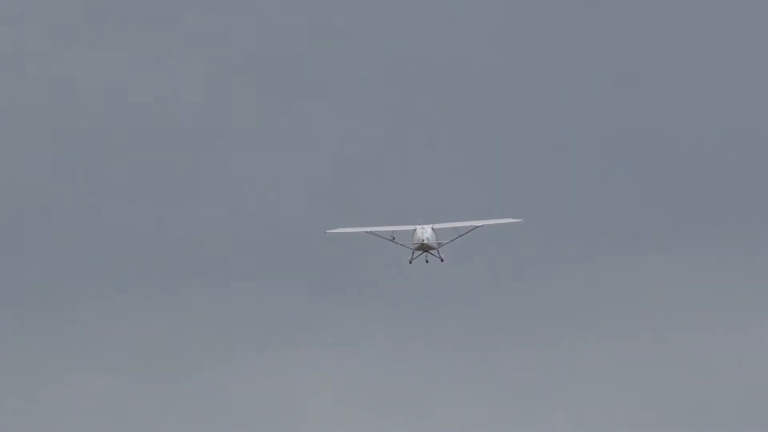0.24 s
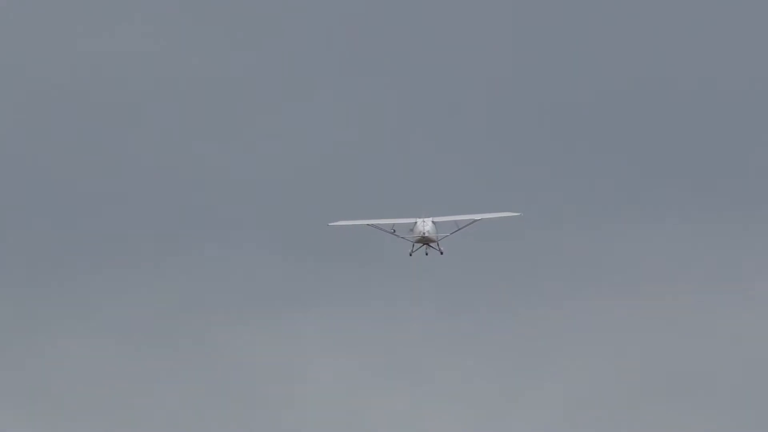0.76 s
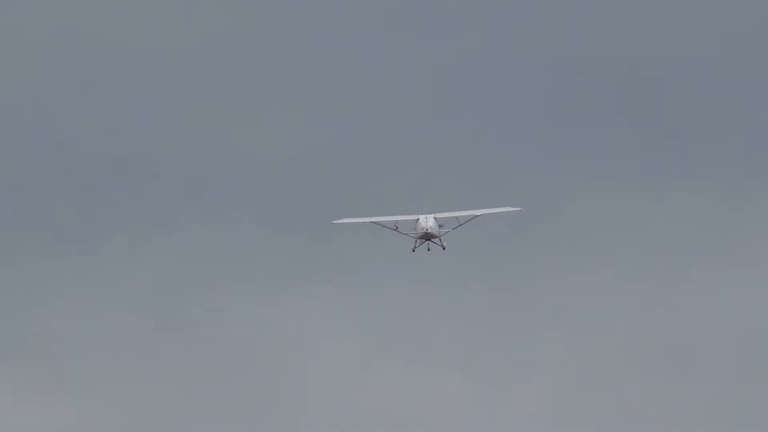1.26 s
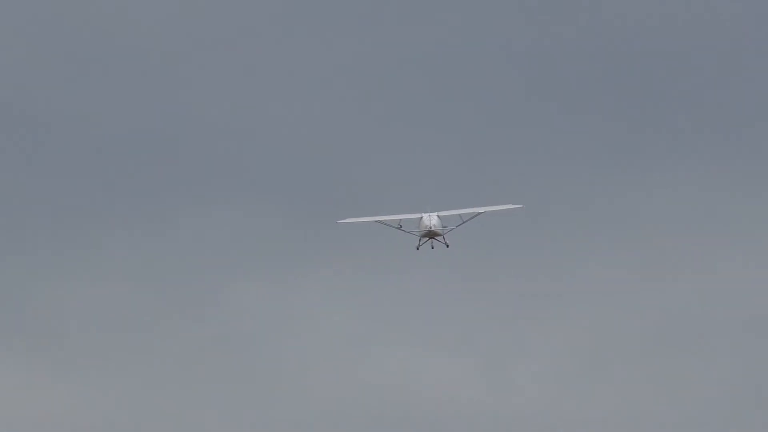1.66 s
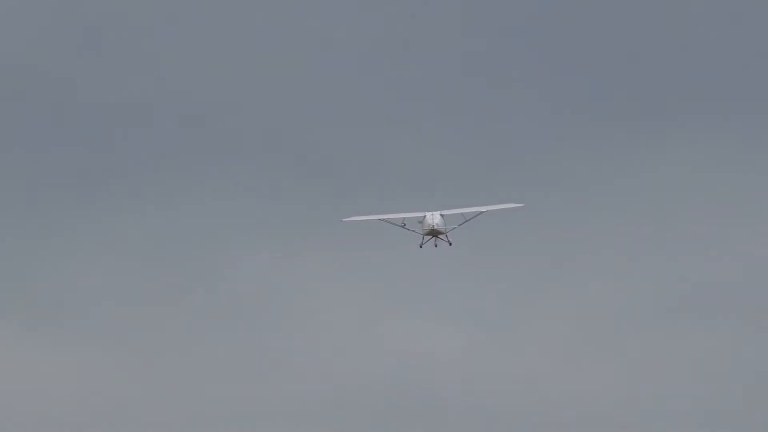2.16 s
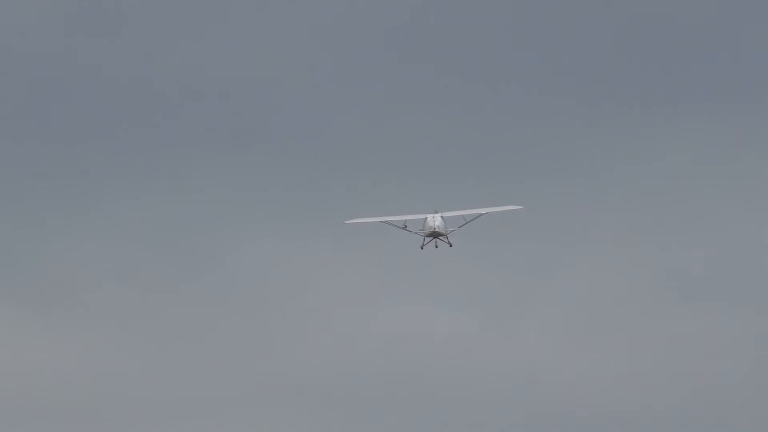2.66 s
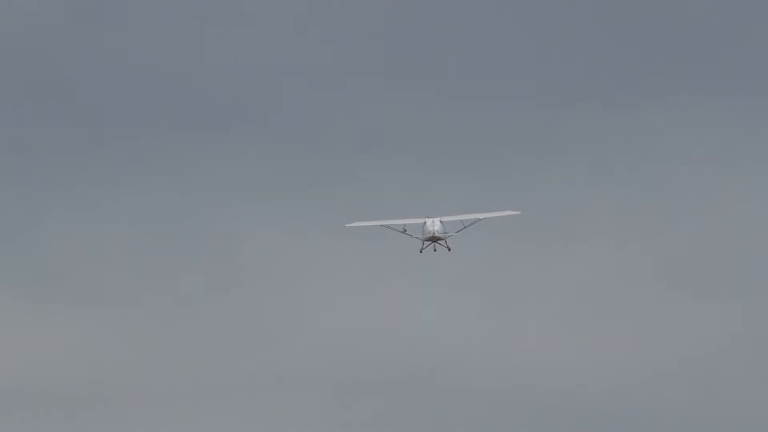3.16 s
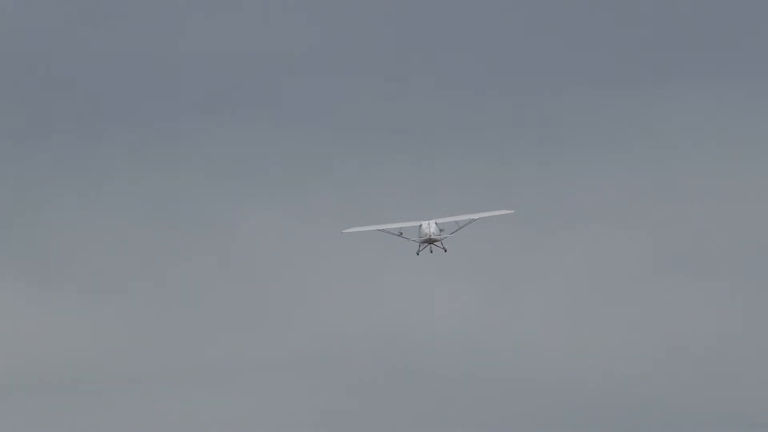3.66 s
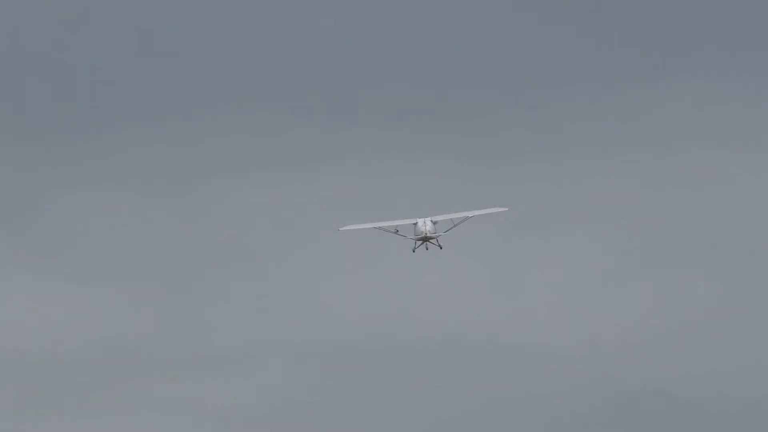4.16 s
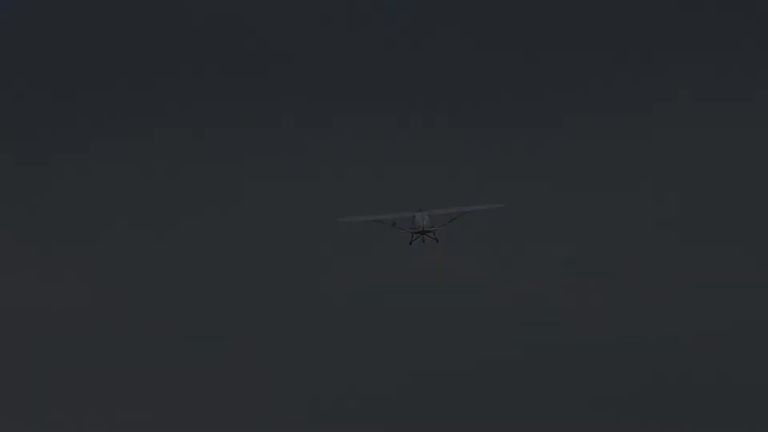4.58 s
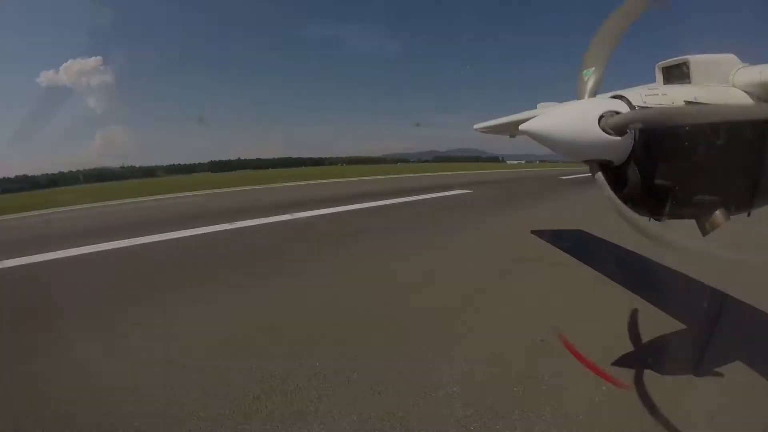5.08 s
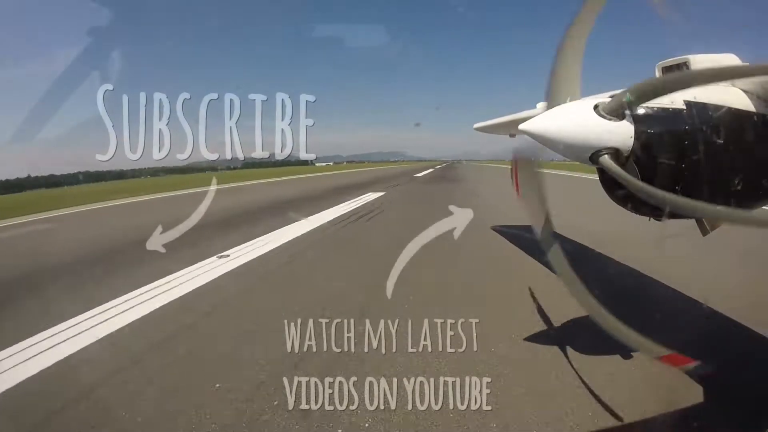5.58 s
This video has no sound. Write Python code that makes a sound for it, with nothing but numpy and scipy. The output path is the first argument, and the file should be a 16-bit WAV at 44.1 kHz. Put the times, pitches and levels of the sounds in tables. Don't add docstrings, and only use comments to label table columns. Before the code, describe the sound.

A small propeller plane drones steadily as it climbs away, with a throaty buzzing rasp, then fades smoothly to silence.

```python
import sys
import numpy as np
from scipy import signal
from scipy.fft import rfft, irfft, next_fast_len
from scipy.io import wavfile
from scipy.ndimage import uniform_filter1d, map_coordinates

SR = 44100
rng = np.random.default_rng(int(sys.argv[2]) if len(sys.argv) > 2 else 0)


def master_out(mix):
    frames = np.transpose(np.atleast_2d(mix))
    ceiling = np.clip(frames, -1, 1)
    pcm = np.round(ceiling * 32767).astype(np.int16)
    wavfile.write(sys.argv[1], SR, pcm)


def elevation(decibels):
    levels = np.asarray(decibels, float)
    return 10 ** (levels / 20)


N = 257103

# time in seconds, pitch in Hz, level in dB.
FAR_HUM = [
    (0, 85, -57),
    (.3, 79.2, -38),
    (.5, 77.4, -38.5),
    (.7, 77.4, -46.5),
    (1.1, 76.8, -50),
    (1.5, 78.5, -47),
    (2.1, 73.4, -47),
    (2.5, 78, -68),
]
# time in seconds, level in dB.
HISS_LEVEL = [(0, -49.5), (.35, -64.5), (.73, -54), (1.8, -67.5), (3.2, -67.5), (3.8, -61), (5.3, -57)]
# frequency in Hz, level in dB per Hz.
HISS_COLOUR = [(7000, -21), (9500, -1.5), (11000, 1.5), (12700, -5), (14200, -9.5), (15000, -14.5),
               (15600, -38)]
# start in seconds, pitch in Hz, level in dB, length in seconds.
RINGS = [
    (0.358, 520, -24.5, 0.083),
    (0.52, 445, -29.5, .07),
    (0.76, 549, -25, 0.044),
    (0.798, 633, -26, 0.1),
    (1.852, 2000, -27.5, 0.055),
]
# frequency in Hz, level in dB.
WASH_COLOUR = [(40, -24), (70, -5), (130, -7), (200, -4), (330, 0.5), (480, -8.5), (800, -49)]
# centre in seconds, lift in dB, half length in seconds.
WASH_SURGES = [
    (0.177, 3.5, 0.069),
    (1.31, 8.5, .05),
]
# centre in seconds, lift in dB, half length in seconds,
# centre frequency in Hz.
GUSTS = [(0.165, -1.5, 0.11, 1940), (.47, 5, 0.22, 3040), (.95, 0.5, 0.077, 3500), (1.174, 2.5, 0.12, 4200),
         (1.35, 0.5, 0.077, 1300), (.66, 0.5, 0.12, 1800), (1.474, 2.5, .1, 650), (1.59, 4.5, 0.094, 5000),
         (1.915, 3, 0.081, 5950), (2.225, 2.5, 0.15, 6000), (2.4, -1.5, 0.16, 650), (2.74, 5, .08, 2900),
         (2.856, 5.5, 0.025, 9050), (2.96, -1.5, 0.03, 3600), (3.123, -3.5, 0.047, 1790),
         (0.765, 2, 0.044, 2100), (4.968, 1.5, 0.057, 8500), (3.4, 5.5, 0.21, 5800),
         (3.403, 2.5, 0.36, 650), (3.687, 9, 0.064, 6100), (3.925, 4.5, 0.089, 4480),
         (4.16, 6, 0.015, 5000), (4.189, 3, 0.21, 650), (4.257, 5, 0.061, 6800), (4.407, -3, 0.034, 7100),
         (4.59, 4.5, .05, 6960), (4.743, -3, 0.044, 3000), (4.834, 5.5, 0.017, 8000),
         (5.108, 2.5, 0.043, 7000)]
# frequency in Hz, level at the start in dB, drift in dB per second as the aircraft turns away.
RASP_BANDS = [(650, -9.5, -1.46), (1520, -17.5, -1.41), (4200, -28, -0.16), (8500, -44, 1)]
# frequency in Hz, level in dB.
RASP_COLOUR = [(150, -35), (350, -8), (500, 0), (2000, 1), (5000, 1), (8500, 3.5), (10500, -15),
               (15000, -33)]
# frequency in Hz, level in dB.
SCATTER_COLOUR = [(100, -37.5), (330, -27), (700, -6.5), (1400, 6.5), (3000, -5.5), (6000, -3), (9000, -9),
                  (12000, -10)]
# time in seconds, firings a second in Hz.
FIRING_RATE = [(0, 133.4), (.45, 133.0), (1.05, 132.5), (1.35, 131.9), (1.65, 131.7), (1.95, 131.9),
               (2.55, 131.6), (2.85, 131.6), (3.45, 131.05), (4.05, 130.55), (4.35, 130.2), (4.65, 129.5),
               (4.95, 128.6), (5.3, 127.6)]
# time in seconds, firing tone in dB, tilt of the tones
# in dB per octave.
ENGINE_NOTE = [
    (0, -34.5, -1.5),
    (.5, -32, -0.5),
    (1, -26.5, -0.5),
    (2.5, -26, 0),
    (3.4, -26, -2.5),
    (4.3, -26.5, -4),
    (4.67, -28, -0.5),
    (5.0, -32, 6),
    (5.25, -37, 11),
]
# multiple of the cycle, level over the firing tone in dB, share of the tilt from
MAIN_TONES = [
    (4, -1.5, -0.52, 0.09),
    (6, 0, 0, 0.056),
    (12, 0.5, 0.97, .05),
]
# multiple of the cycle, level in dB.
THUMP = [(8, -8), (9, -12), (11, -24), (13, -16.5), (14, -8), (15, -3.5), (16, -9), (17, -12.5), (18, -8),
         (19, -16.5), (20, -17), (21, -13), (22, -12.5), (23, -13.5), (24, -9), (25, -21.5), (26, -11),
         (27, -17.5), (28, -12), (29, -16), (30, -13.5), (31, -9.5), (32, -13), (33, -17.5), (34, -18.5),
         (35, -9), (36, -18.5), (37, -13), (38, -16), (39, -11)]
# time in seconds, extra delay in ms, share left, share right, treble kept from 0 to 1.
GROUND_PATH = [(0, 0.5, 0.24, .21, 0.2), (.6, 0.36, 0.16, .07, .6), (1.4, 0.54, 0.53, .3, 0.23),
               (1.9, 0.77, .45, 0.26, 1), (2.4, .9, 0.19, 0.18, 1), (3.2, 1.39, 0.1, .44, 0.7),
               (3.8, 1.69, .3, .25, 0.6), (4.1, 2.0, 0.64, .43, 0.5), (4.5, 2.14, 1, .63, 0),
               (5.3, 2.4, 0.55, .7, 0)]
# time in seconds, extra delay in ms, share left, share right, treble kept
WALL_PATH = [(2.8, 0.72, 0.023, 0.031, 1), (3.4, 0.77, 0.12, 0.079, 1), (4.1, 0.92, 0.082, 0.056, 1),
             (4.7, 1.1, 0.13, 0.076, 1), (5.3, 1.4, 0.3, 0.053, .9)]
# time in seconds, left-right difference in dB, scattered share in dB.
AIM = [(0.0, 5.5, -11), (0.66, -2.5, -8.5), (1.39, -3.5, -13), (3.4, -4.5, -15.5), (5.24, -4, -13)]
TURN = (0.35, 0.82)
# frequency in Hz, left-right difference in dB.
EARLY_LEAN = [(60, 1.5), (110, -12.5), (200, -6), (700, -3), (1290, 12), (2380, 3), (4400, -6.5),
              (15000, 1)]
# frequency in Hz, lead in radians.
EARLY_LEAD = [(340, 1.1), (600, 0.92), (1210, 1.4), (1550, 0.68), (1890, 0.49), (2500, -0.3), (3880, -0.84),
              (6370, 0)]
# frequency in Hz, left-right difference in dB.
LEAN = [(60, -2), (110, -4), (380, 1.5), (700, -1.5), (1290, -14), (2380, -7.5), (4400, -3), (15000, 2.5)]
# frequency in Hz, lead in radians.
LEAD = [(340, 0.56), (600, -1.1), (1030, -0.62), (1720, 0.15), (2760, 0.3), (4050, 0.6), (6980, 0.34),
        (15200, 0.1)]
# time in seconds, left-right difference kept in dB.
TREBLE_WIDTH = [(0, 7), (.3, 0), (.6, -20), (2.3, -0.5), (2.9, 5), (3.7, 6.5), (4.5, 7.5), (5.3, 8.5)]

TIME = np.arange(N) / SR
HALF_EACH = np.array([[.5], [-.5]])


def unit(x):
    return x / np.sqrt(np.mean(x ** 2) + 1e-20)


def along(points, hz):
    f, v = np.transpose(points)
    return np.interp(np.log(hz + 1), np.log(f + 1), v)


def curves(rows):
    s, *cols = np.transpose(rows)
    return [np.interp(TIME, s, c) for c in cols]


def wobble(rate):
    steps = np.arange(0, N + 32, 32)
    knots = rng.standard_normal(int(N * rate / SR) + 4)
    return np.interp(np.arange(N), steps, map_coordinates(knots, [steps * rate / SR]))


def filtered(x, response):
    m = next_fast_len(N + 8192)
    return irfft(rfft(x, m) * response(np.fft.rfftfreq(m, 1 / SR)), m)[..., :N]


def noise(colour, channels=1):
    white = rng.standard_normal((channels, N))
    return unit(filtered(white, lambda hz: elevation(along(colour, hz))))


def patches(shape, bins, frames):
    field = uniform_filter1d(rng.standard_normal(shape), bins, axis=-2)
    return unit(uniform_filter1d(field, frames, axis=-1))


def bells(x, centre, half):
    return np.exp(-((x - np.reshape(centre, (-1, 1))) / np.reshape(half, (-1, 1))) ** 2)


def gusts(hz, t):
    s, db, half, centre = np.transpose(GUSTS)
    half_octaves = 1.35
    breadth = bells(np.log2(hz + 1), np.log2(centre), half_octaves)
    return (db * breadth.T) @ bells(t, s, half)


def far_engine():
    hz, db = curves(FAR_HUM)
    return np.sqrt(2) * elevation(db + 1.5 * wobble(5.9)) * np.sin(2 * np.pi * np.cumsum(hz) / SR)


def air():
    lift_db = 0.97 * gusts(np.array([10500]), TIME)
    z = signal.stft(noise(HISS_COLOUR), nperseg=1024)[2]
    z = z * elevation(3 * patches(z.shape, bins=16, frames=3))
    uneven = signal.istft(z, nperseg=1024)[1][..., :N]
    hiss = elevation(curves(HISS_LEVEL)[0] + lift_db + .8 * wobble(10)) * unit(uneven)
    buffet_db = -61 + 2.5 * wobble(3)
    buffet = noise([(15, -8.5), (30, 6.5), (50, 11), (70, -45.5)], channels=2)
    return hiss + elevation(buffet_db + 3) * buffet


def rings():
    out = np.zeros(N)
    unsteady = 1.1 * wobble(60)
    for s, hz, db, length in RINGS:
        swell = np.sin(np.pi * np.clip((TIME - s) / length, 0, 1)) ** 2
        out += elevation(db) * swell * np.sin(2 * np.pi * hz * TIME + unsteady)
    return out


def wash():
    s, db, half = np.transpose(WASH_SURGES)
    sinking_db = -31 - 1.03 * TIME
    level_db = sinking_db + db @ bells(TIME, s, half) + 1.6 * wobble(5)
    return elevation(level_db) * noise(WASH_COLOUR)[0]


def rasp(cycle, depth, patchy_db):
    stroke = np.exp(-2.5 * (6 * (cycle - .03) % 1))
    blades = 0.092 * np.cos(2 * np.pi * 4 * cycle)
    shaft = 0.035 * np.cos(2 * np.pi * 2 * cycle)
    puff = 1 + 3.25 * depth * (stroke - stroke.mean()) + blades + shaft
    rough = unit(puff * elevation(0.18 * wobble(300))) * rng.standard_normal(N)
    hz, t, z = signal.stft(rough, SR, nperseg=1024)
    bands = np.array(RASP_BANDS)
    start_db = along(bands[:, [0, 1]], hz) + along(RASP_COLOUR, hz)
    drift_db = along(bands[:, [0, 2]], hz)
    gain_db = start_db[:, None] + np.outer(drift_db, t) + gusts(hz, t) - 1.5
    gain_db = gain_db + patchy_db * patches(z.shape, bins=8, frames=6)
    return signal.istft(z * elevation(gain_db), SR, nperseg=1024)[1][:N]


def tones(cycle, level_db, tilt_db):
    out = np.zeros(N)
    skimming_db = 2.5 * np.exp(-(TIME / .45) ** 2)
    for order, db, share, place in MAIN_TONES:
        tone_db = level_db + db + share * tilt_db + (0.41 + skimming_db) * wobble(12)
        out += elevation(tone_db) * np.cos(2 * np.pi * order * (cycle - place))
    thump_db = level_db - 11 + 0.38 * tilt_db - 2 * skimming_db * abs(wobble(28))
    for order, db in THUMP:
        turn = 2 * np.pi * order
        shimmer = elevation(db + 7 + thump_db + 2.4 * wobble(4))
        drift = .00002 * order ** 3 * wobble(16) + rng.normal(0, .0022 * order ** 2)
        if order % 6 == 0:
            out += shimmer * np.cos(turn * (cycle - .045) + drift)
        else:
            out -= shimmer * np.cos(turn * cycle + drift)
    return np.sqrt(2) * out


def echo(x, path, turn):
    delay_ms, left, right, treble = curves(path)
    soft = filtered(x, lambda hz: np.exp(1j * turn) * np.clip(hz / 300, 0, 1) / (1 + (hz / 10000) ** 2))
    bass = filtered(soft, lambda hz: 1 / (1 + (hz / 950) ** 6))
    deep = filtered(soft, lambda hz: 1 / (1 + (hz / 420) ** 4))
    lag = (delay_ms + 0.0071 * wobble(7.8)) * SR / 1000
    when = [np.arange(N) - lag]
    copy = map_coordinates(bass + treble * (soft - bass) - deep, when, order=3)
    common = map_coordinates(deep, when, order=3)
    return np.array([left, right]) * copy + (left + right) / 2 * common


def ports(x, lean, lead):
    def response(hz):
        return elevation(HALF_EACH * along(lean, hz)) * np.exp(1j * HALF_EACH * along(lead, hz) * (hz > 330))
    return filtered(x, response)


def scene():
    background = far_engine() + rings() + air()
    cycle = np.cumsum(curves(FIRING_RATE)[0]) / SR / 6
    direct = wash() + rasp(cycle, depth=0.19, patchy_db=1.17) + tones(cycle, *curves(ENGINE_NOTE))
    arriving = direct + echo(direct, GROUND_PATH, turn=4.3) + echo(direct, WALL_PATH, turn=-0.86)
    turned = np.interp(TIME, TURN, [0, 1])
    heard = (1 - turned) * ports(arriving, EARLY_LEAN, EARLY_LEAD) + turned * ports(arriving, LEAN, LEAD)
    apart = np.array([rasp(cycle, depth=0.1, patchy_db=2.0) for port in "LR"])
    apart = filtered(apart, lambda hz: elevation(along(SCATTER_COLOUR, hz)))
    pan_db, scatter_db = curves(AIM)
    return elevation(HALF_EACH * (pan_db + 3.5)) * heard + elevation(scatter_db + 6.0) * apart + background


def roll_off(x):
    return signal.sosfilt(signal.butter(12, 15640, fs=SR, output="sos"), x)


def record(dry):
    mid, side = (dry[0] + dry[1]) / 2, (dry[0] - dry[1]) / 2
    low_side = filtered(side, lambda hz: 1 / (1 + (hz / 6100) ** 40))
    high_side = filtered(side, lambda hz: (hz > 8300) & (hz < 10600))
    side = low_side + elevation(curves(TREBLE_WIDTH)[0] + 5 * wobble(22)) * high_side
    dull = filtered(np.array([mid + side, mid - side]), lambda hz: 1 / (1 + (hz / 14900) ** 60))
    fade_start, fade_end = 4.37, 5.234
    fader = np.clip((fade_end - TIME) / (fade_end - fade_start), 0, 1) ** 0.99
    return roll_off(dull * fader)


dry = scene()
out = record(dry)
master_out(out)
```